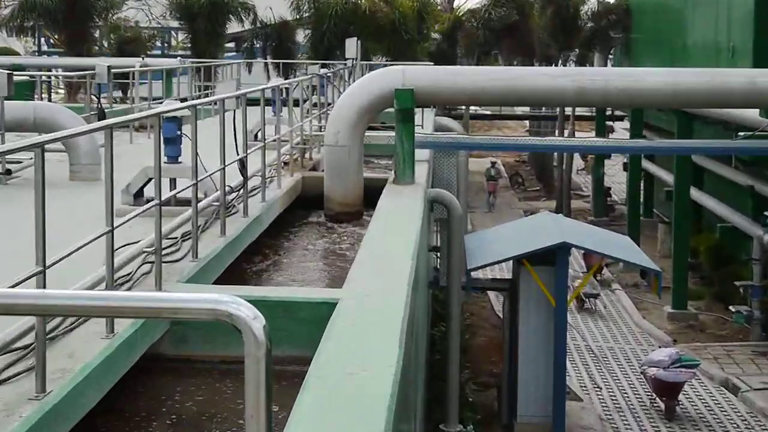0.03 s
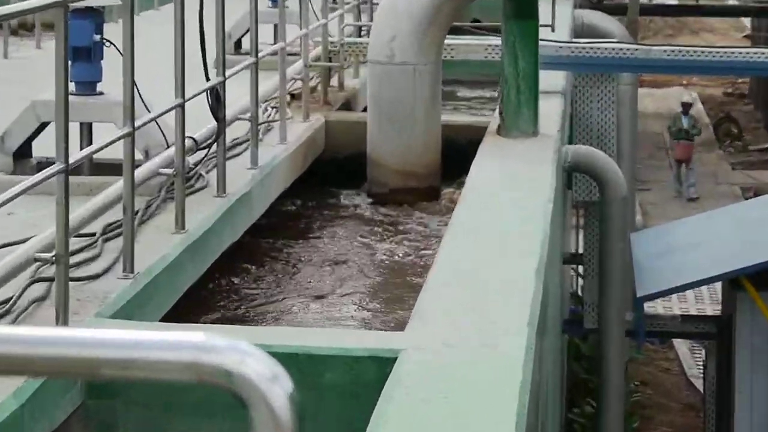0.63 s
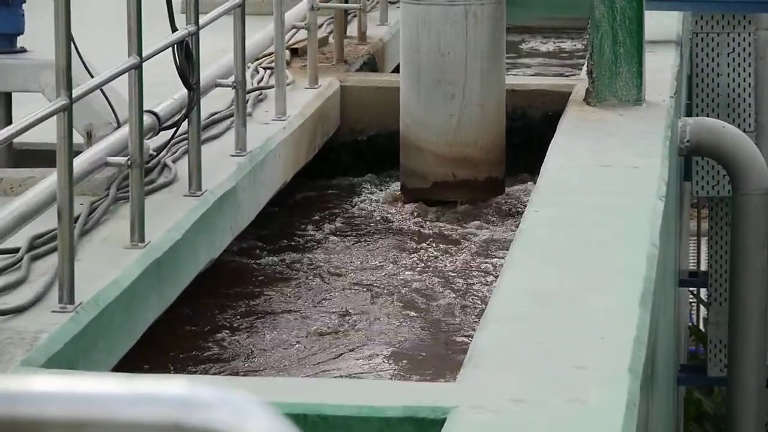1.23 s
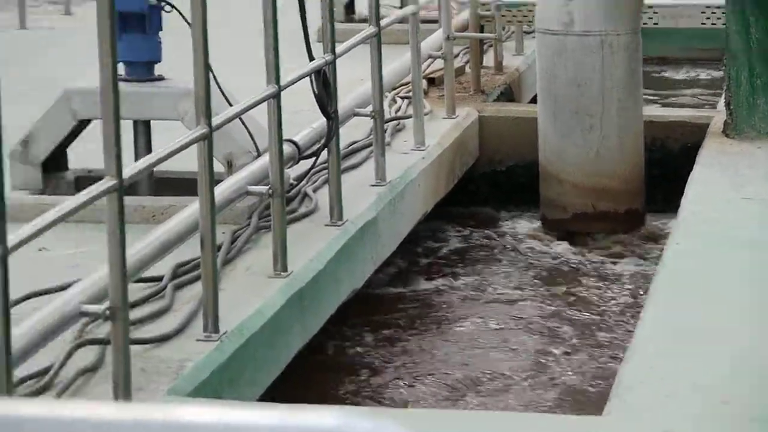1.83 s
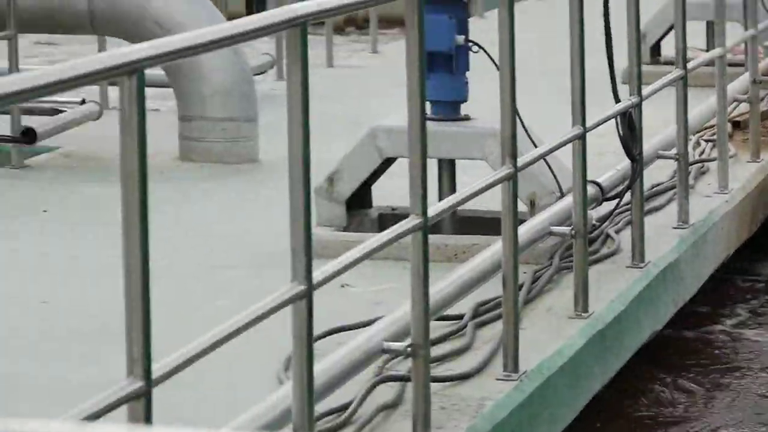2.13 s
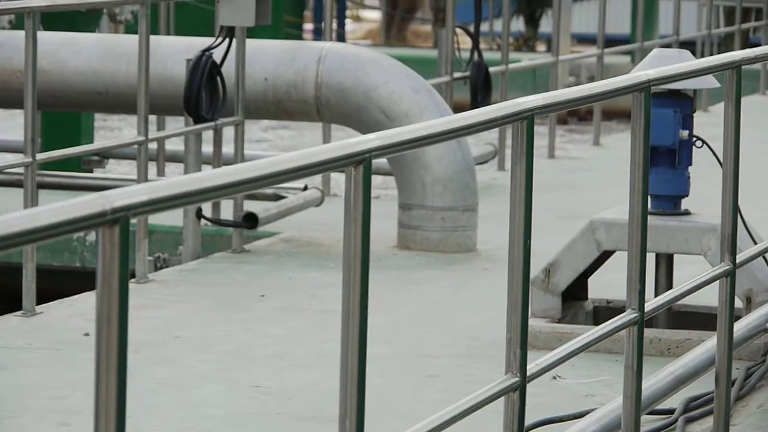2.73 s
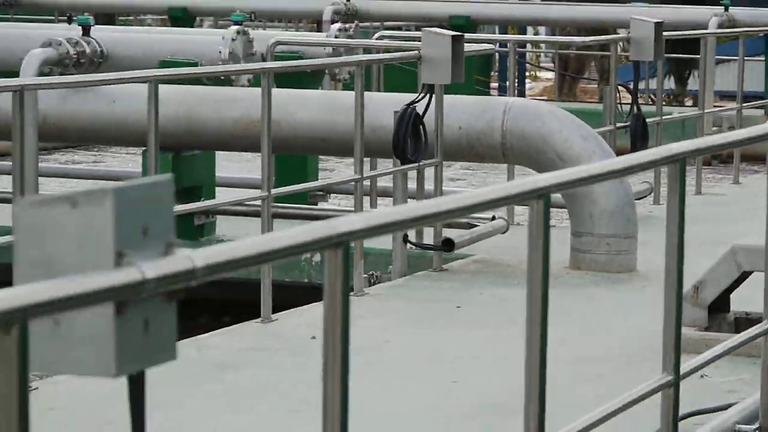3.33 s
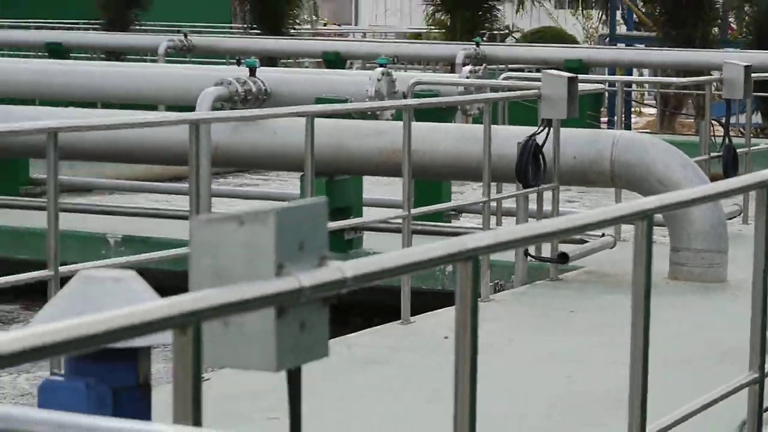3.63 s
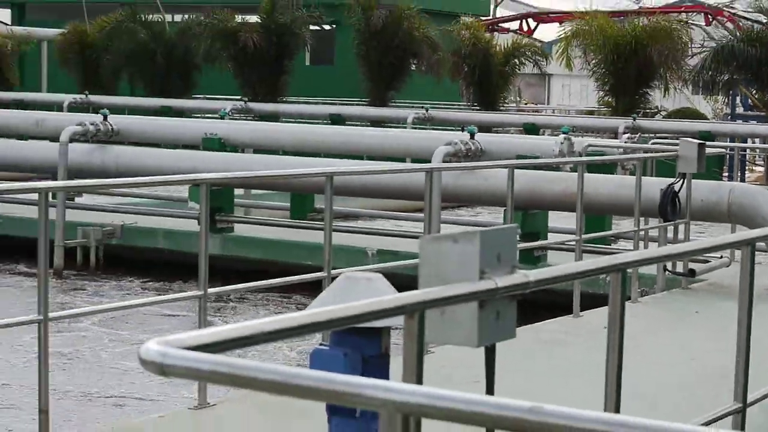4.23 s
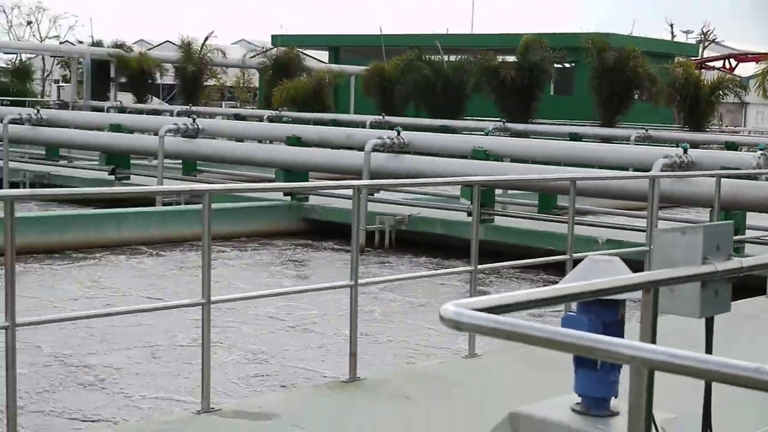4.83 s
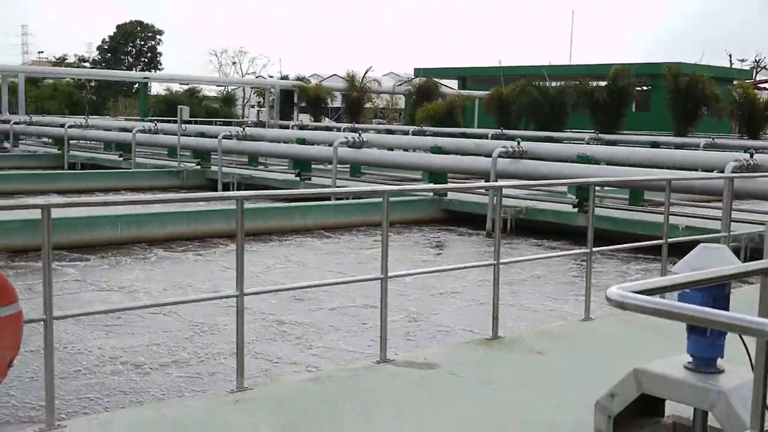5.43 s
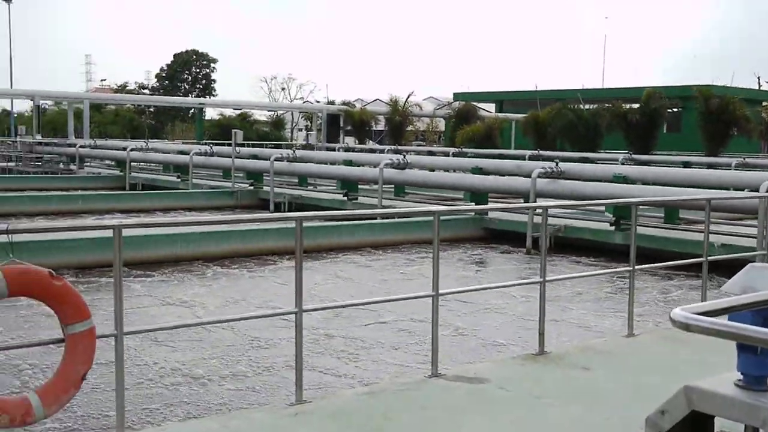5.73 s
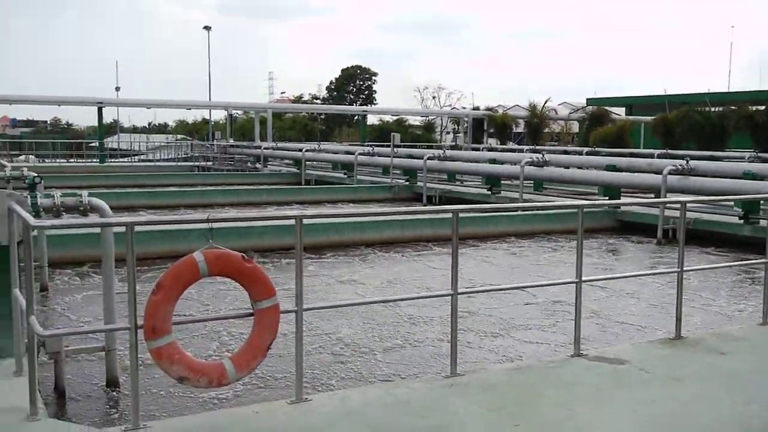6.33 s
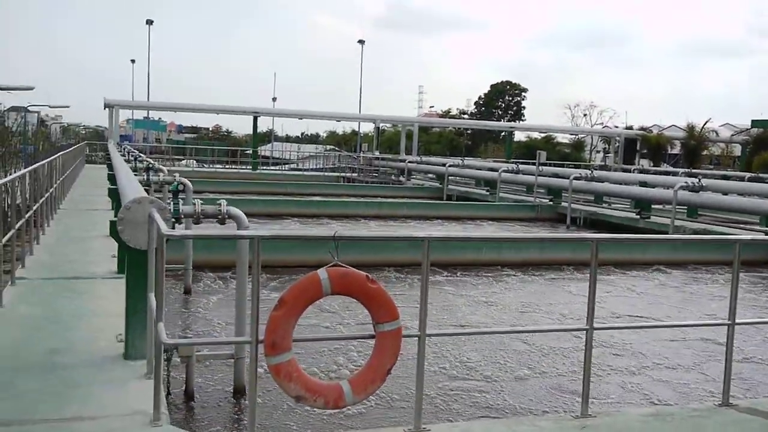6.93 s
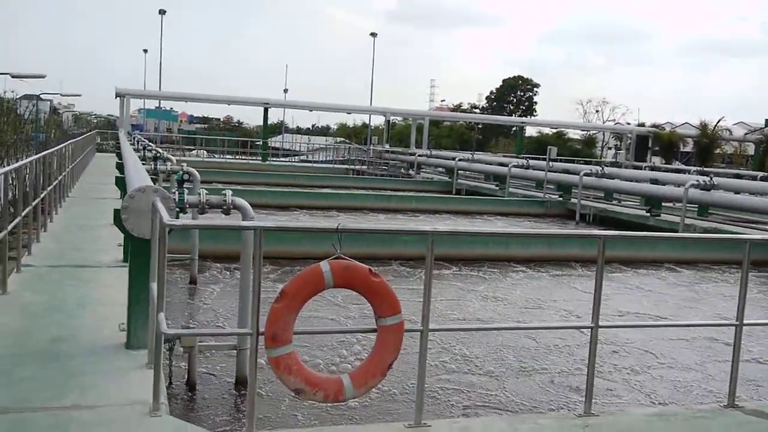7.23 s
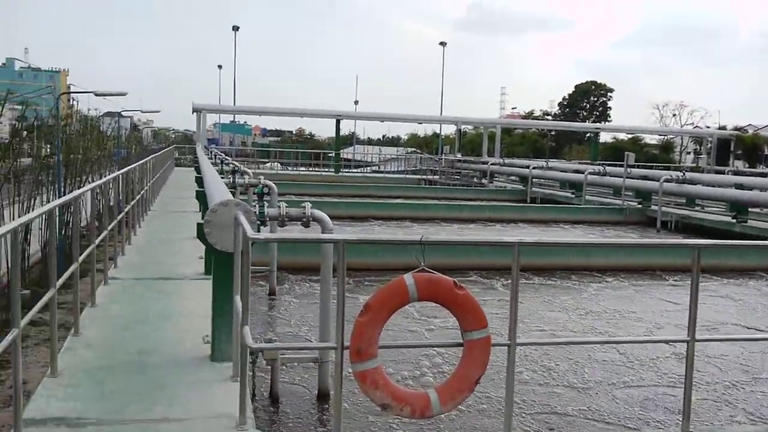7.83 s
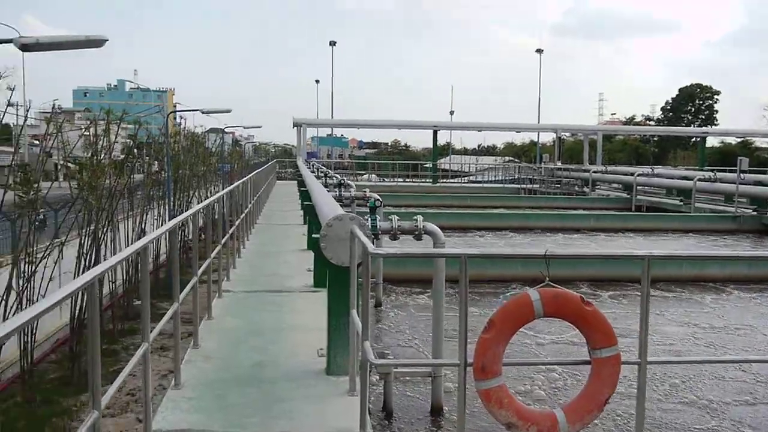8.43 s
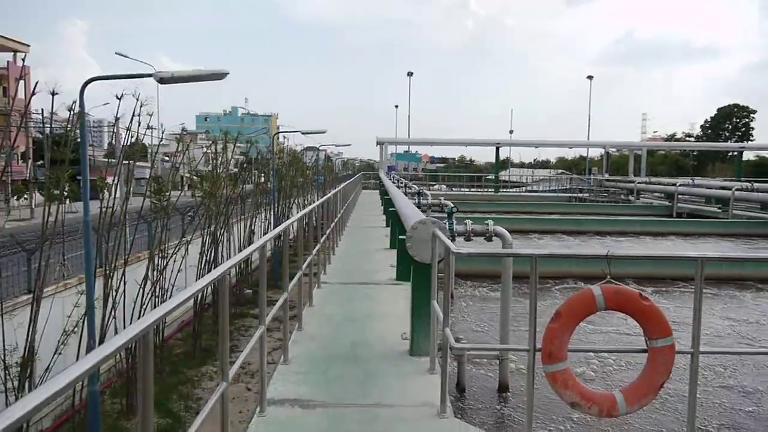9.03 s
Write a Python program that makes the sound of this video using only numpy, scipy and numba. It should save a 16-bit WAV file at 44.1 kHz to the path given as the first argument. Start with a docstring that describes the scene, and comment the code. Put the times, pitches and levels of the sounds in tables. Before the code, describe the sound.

Water churns and fizzes over a steady blower hum, with a few loud knocks on the microphone and traffic swelling late.

```python
"""Water churns and fizzes in the aeration tanks of a wastewater plant, over the hum of an air blower.
The microphone is a hand-held camera's stereo pair, on a walkway by the tanks. It turns towards a road,
where two engines pass and a hiss grows. Right at the microphone, fingers knock and rub on the camera
body; the hardest knocks overload it and its gain control ducks everything."""
import sys
import numpy as np
from scipy import signal
from scipy.fft import rfft, irfft
from scipy.io import wavfile
from scipy.ndimage import uniform_filter1d, minimum_filter1d
from numba import njit

SR = 44100
rng = np.random.default_rng(int(sys.argv[2]) if len(sys.argv) > 2 else 0)


def transcribe(u):
    """Save the signal u as a 16-bit wav file named by the first command-line argument.

    u: samples, shape (n,) or (channels, n), limited to [-1, 1]; the rate is SR.
    q: integer samples, one column per channel.
    """
    v = np.clip(np.atleast_2d(u).T, -1, 1)
    q = np.round(v * 32767).astype(np.int16)
    wavfile.write(sys.argv[1], SR, q)


N = 405279
TIME = np.arange(N) / SR


def gain_of(db):
    """Decibels to gain."""
    return 10 ** (np.asarray(db) / 20)


def unit_rms(x):
    """Scales to rms 1."""
    return x / np.sqrt(np.mean(x ** 2) + 1e-20)


def at_hz(points, hz):
    """Reads a spectrum table on a log-frequency axis."""
    table_hz, value = np.transpose(points)
    return np.interp(np.log(hz + 1), np.log(table_hz + 1), value)


def follow(rows):
    """Each column of a time table, sample by sample."""
    times, *columns = np.transpose(rows)
    return [np.interp(TIME, times, column) for column in columns]


def add(mix, start_s, sound):
    """Mixes in a stereo sound."""
    part = mix[:, max(round(start_s * SR), 0):][:, :sound.shape[1]]
    part += sound[:, :part.shape[1]]


def panned(x, left_db):
    """Makes the left channel left_db louder than the right."""
    return x * gain_of([[left_db / 2], [-left_db / 2]])


def swell(full_db, full_s, db_per_s):
    """A gain that grows steadily in dB, then holds."""
    return gain_of(full_db + db_per_s * np.minimum(TIME - full_s, 0))


def drift(rate_hz):
    """Random wander of rms 1, up to about the given rate."""
    hz = np.fft.rfftfreq(N, 1 / SR)
    spectrum = rfft(rng.standard_normal(N)) * np.exp(-(hz / rate_hz) ** 2) * (hz > 0)
    return unit_rms(irfft(spectrum, N))


def rush(spectrum, patchy_db, left_lead_us, diffuse=1):
    """Noise with drifting patches at the two microphone ports; diffuse sound is less alike at the two."""
    # likeness of the sound at the ports: (frequency [Hz], coherence [0-1])
    likeness = [(50, 0.7), (110, 0.95), (220, 0.96), (490, 1), (1000, 0.83), (2000, 0.32), (4000, 0.7),
                (8000, 1)]
    frames, hz = N // 512 + 5, np.fft.rfftfreq(2048, 1 / SR)
    a, b, c, d, patches = rng.standard_normal((5, frames, len(hz))).transpose(0, 2, 1)
    left, unrelated = a + 1j * b, c + 1j * d
    patches = uniform_filter1d(patches, size=20, axis=0)  # across frequency
    patches = unit_rms(uniform_filter1d(patches, size=7, axis=1))  # across time
    coherence = np.clip(1 - diffuse * (1 - at_hz(likeness, hz)), 0, 1)[:, None]
    delay = np.exp(-2j * np.pi * hz * left_lead_us / 1e6)[:, None]
    right = (coherence * left + np.sqrt(1 - coherence ** 2) * unrelated) * delay
    shaped = np.array([left, right]) * gain_of(at_hz(spectrum, hz)[:, None] + patchy_db * patches)
    return unit_rms(signal.istft(shaped, nperseg=2048, noverlap=1536)[1][:, :N])


def engine(harmonics, nearest_s, fall_3db_s, db, firing_hz, hz_per_s, unsteady):
    """Low harmonics of a passing exhaust, with uneven firing; the level falls with distance."""
    since_s = TIME - nearest_s
    rate_hz = (firing_hz + hz_per_s * since_s) * (1 + unsteady * drift(rate_hz=12))
    firings = np.cumsum(rate_hz) / SR
    tone = 0
    for k, harmonic_db in harmonics:
        level = gain_of(harmonic_db + 3.0 * drift(rate_hz=1.7))
        tone += level * np.sin(2 * np.pi * (k * firings + rng.random()))
    return gain_of(db) / np.hypot(1, since_s / fall_3db_s) * unit_rms(tone)


def road():
    """Traffic roar and hiss swell as the microphone comes to face the road; two engines pass."""
    # spectra of the traffic's roar and hiss: (frequency [Hz], density [dB])
    roar_spectrum = [(45, -25.5), (68, -17.5), (88, -3.5), (140, 0.5), (200, -1), (300, 0.5), (420, -1.5),
                     (600, -5), (1100, -32), (1500, -23.5), (2000, -16.5), (3700, -17.5), (4700, -26.5),
                     (7500, -35.5)]
    hiss_spectrum = [(600, -9.5), (1000, 3.5), (1550, 9), (2100, -6), (2900, -9.5), (3700, 2),
                     (4200, -11.5), (4700, 0.5), (6150, -10.5), (6800, -1.5), (7600, -2)]
    # exhaust harmonics of each engine: (multiple of the firing rate, level [dB])
    cruising_harmonics = [(2, 0), (4, -3.5), (6, -2.5), (7, -2.5), (8, -8.5), (9, 1), (10, -6), (11, -7.5)]
    slowing_harmonics = [(3, -9.5), (4, -3), (5, -17.5), (9, -5), (10, -7), (11, -7)]
    roar = rush(roar_spectrum, patchy_db=0.5, left_lead_us=110, diffuse=2.0)
    roar *= swell(full_db=-25.5, full_s=7.5, db_per_s=2.34)
    hiss = rush(hiss_spectrum, patchy_db=2.5, left_lead_us=137, diffuse=0.97)
    hiss *= swell(full_db=-21.5, full_s=9.11, db_per_s=11.9)
    cruising = engine(cruising_harmonics, nearest_s=8.5, fall_3db_s=0.57, db=-25.5,
                      firing_hz=44.5, hz_per_s=0.18, unsteady=0.0079)
    slowing = engine(slowing_harmonics, nearest_s=7, fall_3db_s=0.5, db=-27,
                     firing_hz=36.5, hz_per_s=-2.5, unsteady=0.00817)
    return roar + cruising + slowing + panned(hiss, left_db=7.0)


def blower():
    """Lobes pulse air into the pipes: a steady hum and overtones, each with a slight random waver."""
    # 2nd and 10th harmonics along the walkway: (time [s], hum level [dB], whine level [dB])
    hum_and_whine = [(0, -23.8, -36), (1.2, -22.5, -44), (5, -24, -49), (7.2, -21, -39),
                     (8.2, -24.5, -42.5), (9.19, -26.5, -44)]
    # the other harmonics: (multiple of the lobe rate, level [dB])
    overtones = [(3, -39.5), (4, -41), (6, -65), (7, -47.5), (9, -46.5), (14, -53.5), (16, -55)]
    lobe_hz, left_lead_s = 110.15, 0.00007
    hum_db, whine_db = follow(hum_and_whine)
    pulses = np.cumsum(lobe_hz * (1 + 0.00086 * drift(rate_hz=6.6))) / SR
    pulses = pulses + lobe_hz * np.array([[left_lead_s], [0]])
    lines = [(2, hum_db + 1.46 * drift(rate_hz=7.7)), (10, whine_db + 0.9 * drift(rate_hz=2.6))]
    lines += [(k, db + 2.3 * drift(rate_hz=1.1)) for k, db in overtones]
    tone = sum(gain_of(db) * np.sin(2 * np.pi * (k * pulses + rng.random())) for k, db in lines)
    return panned(np.sqrt(2) * tone, left_db=-0.9)


def body_ring(bright_hz, octaves, damping=1):
    """One push rings the camera body, favouring modes near bright_hz: the harder, the higher."""
    # modes of the body: (frequency [Hz], bandwidth [Hz], level [dB])
    modes = [(380, 300, -1), (620, 250, 1), (880, 300, 0), (1230, 420, -1), (1700, 750, -2),
             (2400, 800, -2), (3250, 850, 1), (4600, 1500, 0), (5700, 1700, 2), (7100, 1700, 2)]
    port_lag_rad = np.array([[0], [2.01]])  # the right port trails the left
    t = np.arange(900) / SR
    ring = 0
    for k, (hz, width_hz, db) in enumerate(modes):
        share = gain_of(db) / (1 + (np.log2(hz / bright_hz) / octaves) ** 2)
        age = np.pi * width_hz * damping * t
        envelope = (1 - np.exp(-age / 0.69)) * np.exp(-age)
        swing = np.sin(2 * np.pi * hz * t - port_lag_rad)
        ring += (-1) ** k * share * envelope * swing  # neighbouring modes swing in opposite senses
    return ring / abs(ring).max()


def rub(slips, start_s, length_s, bright_hz):
    """One stroke of a finger: its tiny slips ring the camera body."""
    stroke = slips[:, round(start_s * SR):][:, :round(length_s * SR)]
    size = stroke.shape[1]
    stroke = stroke * np.hanning(size) ** .5
    ringing = signal.fftconvolve(stroke, body_ring(bright_hz, octaves=1.0), axes=1)
    return unit_rms(ringing[:, :size])


def handling():
    """Handling noise right at the microphone: fingers click, thud and rub on the camera body."""
    # sharp clicks: (time [s], peak [dB], brightness [Hz], left minus right [dB])
    clicks = [(2.083, -17, 4500, -3), (2.4290, -12, 6100, -12), (2.7578, 1, 5400, -2),
              (2.7930, -14, 6500, -8), (2.8132, 9, 5200, -2), (2.8310, 1, 6500, -6),
              (2.8332, 7.5, 2700, -2.5), (5.0967, 2, 2500, 3.5), (5.1071, 4.5, 4870, -13),
              (5.1560, -4, 7000, -1), (5.2686, 2, 4500, -8.5), (5.2866, 4, 4600, -4),
              (7.7844, -7, 4640, -12), (7.7975, -5, 4560, 1), (8.0780, -15.5, 4500, -7),
              (8.3680, -5, 5000, -6), (8.4400, -0.5, 1600, -8)]
    # dull thuds of the whole case: (time [s], peak [dB], brightness [Hz])
    thuds = [(2.8333, -2.5, 910), (5.2692, 5.5, 400), (5.2701, 5, 1290), (5.3477, 17.5, 547),
             (8.4530, -2.5, 514)]
    # sliding fingers: (middle [s], length [s], rms level [dB], brightness [Hz])
    strokes = [(.19, 0.035, -37.5, 6000), (5.095, 0.02, -24, 2200), (5.127, 0.065, -15.5, 5460),
               (5.233, 0.18, -27.5, 5500), (5.187, 0.086, -13.5, 1100), (5.312, 0.044, -17.5, 6500),
               (5.346, 0.032, -15, 2200), (5.407, 0.047, -27.5, 4000), (7.18, 0.6, -41.5, 7500),
               (7.783, 0.093, -25, 1260), (7.834, 0.056, -34, 5150), (8.364, 0.027, -32, 2200),
               (8.436, 0.067, -28, 2420)]
    out = np.zeros((2, N))
    for time_s, db, bright_hz, left_db in clicks:
        add(out, time_s, gain_of(db) * panned(body_ring(bright_hz, octaves=0.62), left_db))
    for time_s, db, bright_hz in thuds:
        thud = body_ring(bright_hz, octaves=0.73, damping=0.96)
        add(out, time_s, gain_of(db) * panned(thud, left_db=9.5))
    grip_db, slips_per_s = 2.0, 7000
    grip = gain_of(grip_db * drift(rate_hz=90))  # the skin catches and lets go
    slips = rng.standard_normal((2, N)) * (rng.random(N) < slips_per_s / SR) * grip
    slips = slips + 0.1 * slips[::-1]  # each slip reaches both ports
    for middle_s, length_s, db, bright_hz in strokes:
        start_s = middle_s - length_s / 2
        add(out, start_s, gain_of(db) * rub(slips, start_s, length_s, bright_hz))
    return out


def bubbles(low_hz, high_hz, per_s, cycles, spread_db, sizes=24):
    """Bubbles of many sizes ring briefly, rising in pitch as they reach the surface."""
    out = np.zeros((2, N))
    for hz in np.geomspace(low_hz, high_hz, sizes):
        age = np.arange(0, 1, hz / cycles / SR)  # 0 to 1 over one bubble's ring
        chirp = np.sin(2 * np.pi * cycles * age * (1 + 0.12 * age))
        ring = chirp * gain_of(-40 * age) * np.sqrt(low_hz / hz)
        strengths = gain_of(spread_db * np.minimum(rng.exponential(1, N), 4))
        onsets = rng.random(N) < per_s / sizes / SR
        train = signal.oaconvolve(strengths * onsets, ring)[:N]
        out += [np.roll(train, rng.integers(-8, 4)), train]  # each size has its own delay between ports
    return unit_rms(out)


def water():
    """Air boils up through the tanks by the walkway: a surging wash, bubbles in it, foam on top."""
    # spectra of churning water and bursting foam: (frequency [Hz], density [dB])
    churn_spectrum = [(25, -26), (38, -14), (49, -2.5), (66, -6), (95, -3.5), (170, 0), (320, 0.5),
                      (450, -5), (600, -8), (980, -6), (1500, -13), (2100, -21.5), (4000, -28.5),
                      (8000, -41.5)]
    fizz_spectrum = [(900, -8), (2000, -11), (3200, -14.5), (4200, 1.5), (5100, 7.5), (6000, 3),
                     (7500, 3.5)]
    # nearness of the foam as the microphone sweeps the tanks: (time [s], level [dB])
    foam_nearness = [(0, -37.5), (1.3, -41), (3.3, -36), (3.9, -38), (4.9, -33.5), (5.8, -41.5),
                     (6.4, -37.5), (7.5, -46.5)]
    churn_db = np.interp(TIME, [5.2, 5.9], [-22.5, -24])  # drops on the turn towards the road
    (foam_db,) = follow(foam_nearness)
    surge = drift(rate_hz=9)
    wash = gain_of(churn_db + 0.82 * surge) * rush(churn_spectrum, patchy_db=1.1, left_lead_us=-27)
    gurgle = bubbles(low_hz=514, high_hz=1750, per_s=700, cycles=13, spread_db=0.5)
    gurgle *= gain_of(churn_db - 16.5 + 0.41 * surge)
    fizz = gain_of(2.0) * rush(fizz_spectrum, patchy_db=2.5, left_lead_us=54.5)
    pops = gain_of(-4.5) * bubbles(low_hz=2210, high_hz=7900, per_s=2500, cycles=0.92, spread_db=5)
    foam = gain_of(foam_db) * (fizz + pops)
    return panned(wash + gurgle, left_db=-1.05) + panned(foam, left_db=3.0)


def scene():
    """Tanks, blower, road and the hand on the camera, as heard from the walkway."""
    return water() + blower() + road() + handling()


@njit
def ducking(over_db, attack, hold, release):
    """Gain reduction in dB: grows quickly under overload, waits, then dies away (times in samples)."""
    out, cut, wait = np.zeros(len(over_db)), 0., 0.
    for i in range(len(over_db)):
        if over_db[i] > cut:
            cut += (over_db[i] - cut) / attack
            wait = hold
        elif wait > 0:
            wait -= 1
        else:
            cut -= cut / release
        out[i] = cut
    return out


def gain_control(x, limit_db, attack_s, hold_s, release_s):
    """Turns the sound down a moment after its peaks pass the limit, too late for a knock's first peak."""
    peak = -minimum_filter1d(-abs(x).max(0), size=24)  # running maximum
    over_db = np.roll(20 * np.log10(peak + 1e-9) - limit_db, 30)  # 30 samples late
    return x / gain_of(ducking(over_db, attack_s * SR, hold_s * SR, release_s * SR))


def record(dry):
    """The camera's sound chain: rumble filter, dull microphone, gain control, overload, band limit."""
    low_cut_hz, mic_edge_hz, band_edge_hz = 36, 7890, 16000
    rumble_filter = signal.butter(4, low_cut_hz, "highpass", fs=SR, output="sos")
    mic_response = signal.firwin(61, mic_edge_hz, window=("kaiser", 5), fs=SR)
    band_limit = signal.firwin(511, band_edge_hz, window=("kaiser", 9), fs=SR)
    dull = signal.oaconvolve(signal.sosfilt(rumble_filter, dry), mic_response[None], "same")
    ducked = gain_control(dull, limit_db=-4.5, attack_s=0.0019, hold_s=0.059, release_s=0.081)
    soft_clipped = ducked / (1 + ducked ** 8) ** (1 / 8)
    return signal.oaconvolve(soft_clipped, band_limit[None], "same")


dry = scene()
out = record(dry)
transcribe(out)
```